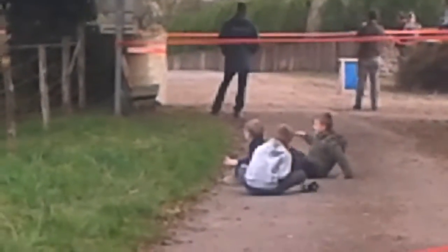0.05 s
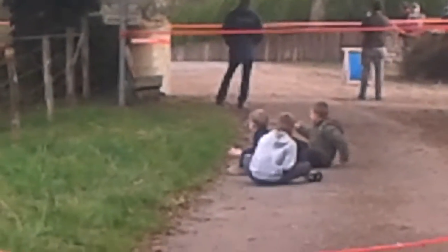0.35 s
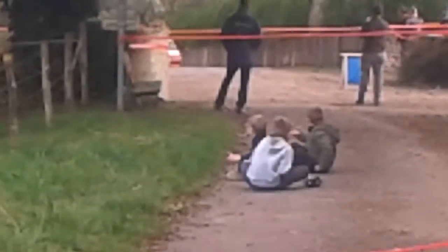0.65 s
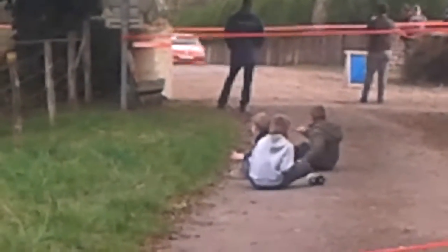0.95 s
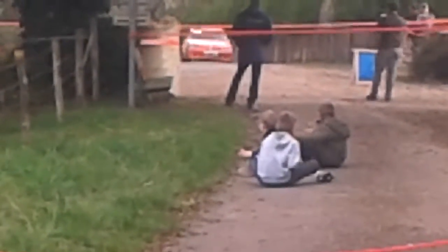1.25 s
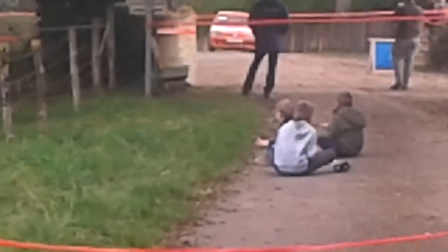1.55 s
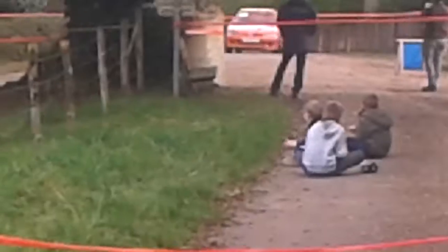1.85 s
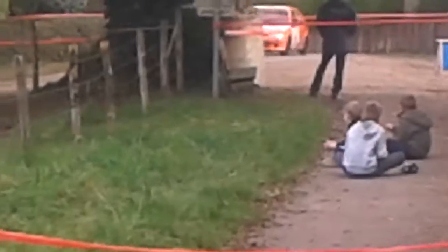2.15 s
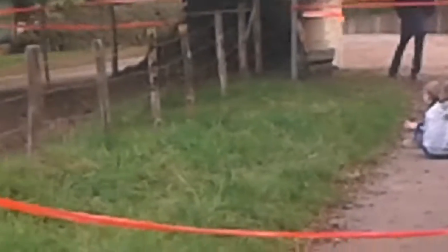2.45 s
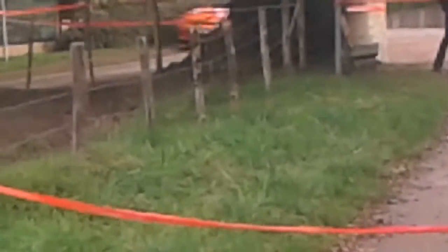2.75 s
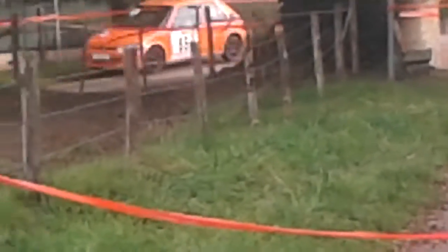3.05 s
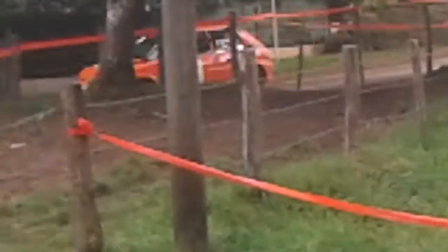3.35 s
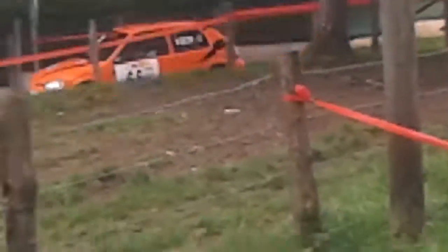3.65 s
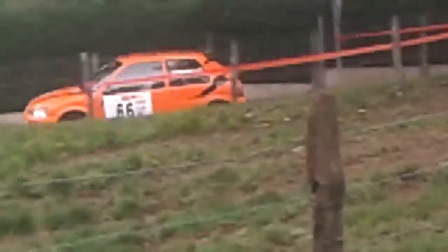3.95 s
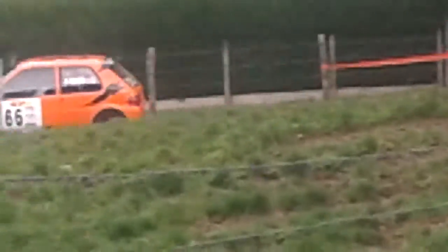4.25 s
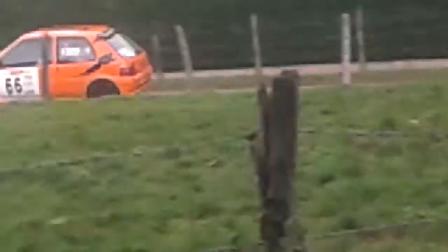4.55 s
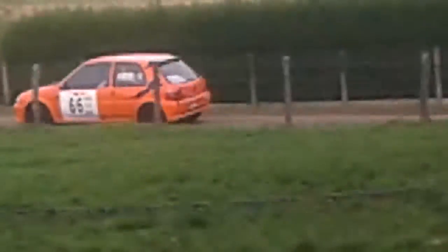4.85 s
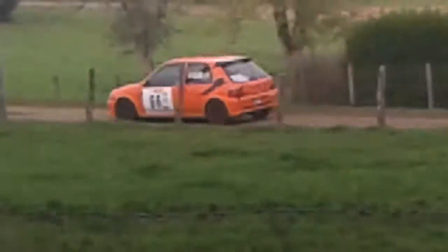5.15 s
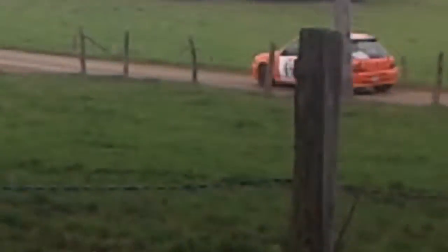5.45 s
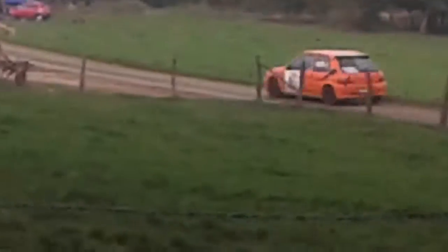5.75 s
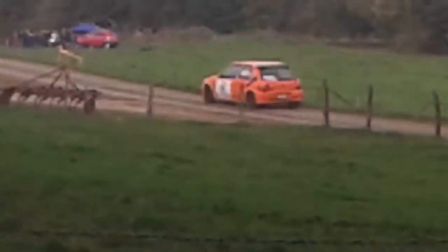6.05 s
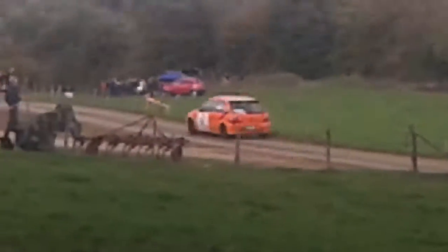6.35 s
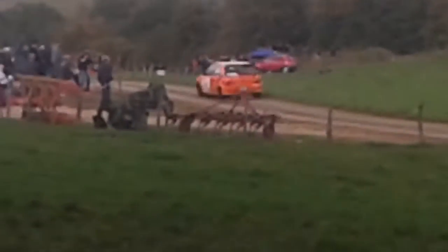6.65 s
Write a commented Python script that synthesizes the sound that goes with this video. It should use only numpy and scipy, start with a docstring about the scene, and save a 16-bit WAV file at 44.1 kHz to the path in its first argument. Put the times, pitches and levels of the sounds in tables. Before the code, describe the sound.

Heard from across a field, a rally car brakes with a short tyre chirp and works through a bend on and off the throttle. Its engine swells into a loud, rising boom with rasp, light clatter and tyre hiss as it goes by. The driver lifts off, the exhaust gives a quick run of pops, and the car drives away in a higher gear, throwing gravel over faint low air noise.

```python
"""Rally car on a dirt road

A four-cylinder hatchback takes a bend on and off the throttle, passes across a field and shifts up.
The exhaust booms on the firing note, with weaker lines from unequal cylinders; fuel pops in the shift.
Gas rasps at each firing, valve gear clatters, tyres hiss, chirp and throw gravel, two stones tick.
Trees return the boom, low air noise flutters, and a faint, distant tone glides in the first second."""
import sys
import numpy as np
from scipy import signal
from scipy.fft import rfft, irfft, next_fast_len
from scipy.io import wavfile
from scipy.ndimage import uniform_filter1d

SR = 44100
rng = np.random.default_rng(int(sys.argv[2]) if len(sys.argv) > 2 else 0)


def master(y):
    """Save y as 16-bit WAV."""
    cut = np.clip(np.atleast_2d(y).T, -1, 1)
    pcm = np.round(cut * 32767)  # scale
    wavfile.write(sys.argv[1], SR, pcm.astype(np.int16))


N = 304731
T = np.arange(N) / SR
PASS_S, SPEED_M_S, CLOSEST_M = 4.92, 15.3, 23
SURGE_DB = 1.1  # spread of rasp and clatter level

# engine speed as heard (time [s], firing rate [Hz])
FIRING_HZ = [(0, 277), (.1, 281), (.35, 241), (.9, 184), (1.0, 212), (1.15, 243), (1.27, 256), (1.5, 225),
             (1.63, 224), (1.77, 204), (1.92, 215), (2.1, 196), (2.46, 212), (2.65, 197), (3.05, 197),
             (3.4, 220), (3.55, 201), (3.72, 210), (3.83, 207), (3.92, 213), (4.1, 217), (4.23, 225),
             (4.45, 227), (4.6, 234), (4.84, 237), (5.06, 247), (5.32, 241), (5.51, 219), (5.6, 200),
             (5.7, 186), (5.82, 196), (5.95, 195), (6.91, 214)]
# (time [s], opening [0-1])
THROTTLE_OPEN = [(5.18, 1), (5.21, .2), (5.495, .2), (5.52, 1)]
# ragged among trees and off throttle, steady under load (time [s], note waver [0-1], overtone waver [0-1])
WAVER = [(0, .32, .8), (1.3, .3, .8), (1.5, .22, .7), (1.9, .17, .4), (2.3, .12, .7), (3.0, .08, 1.),
         (3.8, .05, .8), (4.6, .04, .35), (5.15, .05, .3), (5.25, .2, .4), (5.48, .2, .5), (5.58, .07, .17),
         (6.3, .065, .25), (6.91, .05, .45)]
# exhaust lines at 1, 1.5, 2 and 3 times the firing rate (time [s], level [dB])
BOOM_DB = [(0, -37.5), (.1, -33), (.25, -35.5), (.45, -34), (.68, -27.5), (.87, -38.5), (1.07, -28),
           (1.14, -35.5), (1.5, -27.5), (1.95, -23), (2.2, -26.5), (2.8, -28.5), (2.87, -22.5),
           (3.05, -19.5), (3.4, -14), (4.35, -10.5), (4.7, -12), (4.87, -8.5), (4.97, -10.5), (5.01, -16),
           (5.15, -14), (5.65, -11.5), (5.95, -12.5), (6.45, -11.5), (6.91, -11.5)]
FIFTH_DB = [(.8, -66), (1.1, -46), (1.95, -43.5), (2.55, -43), (2.8, -53), (3.0, -42.5), (3.5, -51),
            (3.8, -61.5)]
OCTAVE_DB = [(0, -68), (.7, -51), (.88, -53), (1.0, -53), (1.35, -54.5), (1.5, -46), (2.14, -39.5),
             (2.25, -55), (3.2, -46.5), (3.95, -33.5), (4.2, -34.5), (4.3, -38), (4.5, -36.5), (4.6, -25.5),
             (4.88, -33.5), (5.02, -23), (5.13, -27), (5.2, -32.5), (5.31, -32), (5.35, -57), (5.49, -55),
             (5.515, -24.5), (5.7, -19), (6.2, -25.5), (6.65, -29), (6.91, -36)]
THIRD_HARMONIC_DB = [(1.45, -66), (1.8, -53), (2.2, -62), (3.35, -64), (3.6, -48), (4.15, -43), (4.5, -51),
                     (5.15, -51), (5.25, -68), (5.5, -66), (5.8, -51), (6.4, -45.5), (6.65, -39),
                     (6.91, -44)]
# brief dips in the boom (time [s], half width [s], depth [dB])
BOOM_DIPS = [(.25, 0.017, 11), (.35, 0.054, 12), (.935, 0.023, 11), (1.19, 0.048, 6), (1.33, 0.064, 11),
             (1.57, 0.011, 4.5), (1.715, 0.018, 17), (2.18, 0.019, 11), (2.32, 0.03, 11), (2.465, 0.014, 4),
             (2.65, 0.039, 5), (2.935, 0.011, 6.5), (3.04, 0.032, 8), (3.28, 0.041, 10), (3.53, 0.037, 5.5),
             (3.65, 0.023, 7), (3.93, 0.012, 4.5), (4.14, 0.071, 5), (4.22, 0.0089, 3.5),
             (4.59, 0.06, 10.5), (5.09, 0.016, 15), (5.416, 0.0064, 13), (5.487, .008, 8)]
# uneven firing (time [s], level of lines between harmonics [dB], scatter level [dB])
UNEVEN_DB = [(0, -56, -47), (1.5, -50, -43.5), (3.0, -46, -42), (3.8, -38, -39), (4.2, -30.5, -36.5),
             (5.15, -23.5, -34.5), (5.3, -36, -40), (5.48, -38, -40), (5.55, -28.5, -35),
             (5.9, -29.5, -35.5), (6.3, -26.5, -38), (6.91, -28.5, -37.5)]
# off-throttle pops (time [s], gain [dB])
POP_DB = [(.168, -34), (.277, -33), (1.005, -33), (1.026, -28), (1.288, -27), (1.675, -34), (2.168, -34),
          (3.375, -29), (5.224, -17.5), (5.246, -11.5), (5.259, -15.5), (5.277, -12), (5.336, -14),
          (5.374, -19), (5.395, -13), (5.432, -12), (5.463, -13), (5.492, -15.5), (5.511, -16)]
# pipe ring after a pop (frequency [Hz], decay [s], gain [dB])
PIPE_MODES = [(72, 0.02, -11), (122, 0.014, -2), (205, 0.016, 6), (262, 0.012, -2), (366, 0.012, -10)]
# gas rasp, loudest under load and close (time [s], level [dB])
RASP_DB = [(0, -53.5), (.7, -46), (.9, -47), (1.25, -42.5), (1.9, -47), (2.4, -48), (2.85, -50.5),
           (3.25, -42), (3.6, -40), (4.2, -39), (4.6, -37.5), (4.8, -39.5), (5.1, -36.5), (5.45, -46),
           (5.75, -40.5), (6.91, -38)]
# tones in the rasp (multiple of firing rate [1], gain [dB])
RASP_TONES = [(4, -21), (5, -21), (6, -26)]
# wall, onlookers, trees and bank hide the car in turn (time [s], half width [s], cover [0-1])
COVER = [(0.355, 0.71, 1.), (1.607, 0.82, .4), (2.801, 0.28, 0.7), (3.719, 0.18, 0.09)]
# loose road swells hiss and clatter (time [s], half width [s], gain [dB])
LOOSE_ROAD = [(.25, 0.5, 4), (2.36, 0.6, 3), (3.28, 0.25, 4), (4.6, 0.1, 4), (5.08, 0.17, 6.5),
              (6.15, 0.24, 1.5), (6.68, 0.027, 3.5)]
# rubber scuffs (time [s], half width [s], level [dB])
TYRE_SCUFFS = [(0.53, 0.015, -45), (0.565, 0.01, -44), (0.595, 0.014, -42.5), (1.586, 0.026, -44.5)]
# tyre tones under braking and in the bend (time [s], pitch [Hz], level [dB])
TYRE_CHIRP = [(.545, 1644, -52), (.558, 1560, -37.5), (.569, 1490, -36.5), (.574, 1400, -26.5),
              (.583, 1400, -33), (.591, 1480, -28), (.599, 1520, -29), (.606, 1440, -45), (.62, 1480, -75)]
TYRE_SQUEAL = [(1.12, 830, -62), (1.22, 890, -56), (1.29, 1020, -54), (1.36, 970, -52), (1.5, 900, -58),
               (1.7, 880, -66), (1.89, 990, -60), (1.94, 1055, -50.5), (2.0, 1100, -49), (2.05, 1060, -51),
               (2.11, 990, -64), (2.18, 925, -53), (2.45, 920, -53), (2.6, 900, -70), (3.0, 890, -70),
               (3.12, 905, -50), (3.24, 930, -44), (3.33, 890, -56)]
# gravel spray and grit crunch (time [s], level [dB])
SPRAY_DB = [(5.9, -66.5), (6.3, -45), (6.55, -43.5), (6.7, -35.5), (6.91, -40.5)]
CRUNCH_DB = [(1.0, -91), (1.3, -68), (1.9, -66), (2.35, -58.5), (2.8, -90)]
# flicked stones (time [s], peak level [dB])
STONE_DB = [(3.4697, -28), (6.4088, -30.5)]
# boom off the trees, lower from those behind, higher from those ahead (time [s], pitch ratio [1], level [dB])
TREE_ECHO = [(3.0, 0.89, -46), (3.65, 0.87, -33), (4.3, 0.85, -36), (4.9, 0.91, -40), (5.5, 1.73, -41),
             (5.9, 1.3, -35.5), (6.4, 0.97, -38), (6.91, 1.3, -39)]
# low air flutter (time [s], level [dB])
FLUTTER_DB = [(0, -45.5), (1.2, -46.5), (2.7, -45), (3.6, -38.5), (4.2, -38.5), (4.7, -40), (5.3, -39),
              (5.8, -45), (6.3, -46.5), (6.91, -46)]
# faint, distant tone (time [s], pitch [Hz], level [dB])
FAR_TONE = [(.2, 458, -53), (.32, 373, -48), (.4, 408.4, -44), (.48, 473, -50), (.6, 498, -49),
            (.7, 411.4, -31.5), (.79, 436.5, -43.5), (.95, 377.6, -47)]

# spectra (frequency [Hz], relative density [dB])
PIPE_SPECTRUM = [(55, -24.5), (100, -10), (120, -4.5), (155, -6.5), (180, 1), (255, 1.5), (305, -2.5),
                 (355, -2), (420, -4), (465, -19.5), (560, -25), (720, -28)]
RASP_SPECTRUM = [(300, -13), (500, -4.5), (625, -1), (750, -4.5), (970, -0.5), (1200, 0), (1450, -5),
                 (1800, -10), (2600, -16.5), (4000, -43.5)]
CLATTER_SPECTRUM = [(900, -29), (1500, 2.5), (1900, 1.5), (2600, 1), (3100, -14), (3800, -20),
                    (5000, -39.5)]
HISS_SPECTRUM = [(2000, -2.5), (3200, 6), (4000, -0.5), (5000, -5.5), (6100, -5.5), (6800, -14.5),
                 (7400, -24), (8000, -52)]
STONE_SPECTRUM = [(1500, 0), (5500, 0), (7000, -7), (9000, -20), (11500, -17)]
FLUTTER_SPECTRUM = [(25, -41), (38, -30), (55, -15), (75, -4), (100, -1.5), (130, -2.5), (200, -7),
                    (400, -12.5), (700, -22)]
SCUFF_SPECTRUM = [(1200, -21.5), (1700, 2), (2200, -3), (2750, -9), (3500, -23), (5000, -60)]
SPRAY_SPECTRUM = [(850, -17), (1150, -2.5), (1400, -.5), (1650, -7.5), (2000, -20.5)]
CRUNCH_SPECTRUM = [(2700, -13.5), (3500, 1), (4200, -6.5), (5000, -20.5)]


def exhaust(firings, shut_db=-13):
    """Firing pulses boom, sinking off throttle; lines sound a fifth, an octave and a twelfth above."""
    note_waver, overtone_waver = curves(WAVER)
    phase = 2 * np.pi * firings
    boom_db = curve(BOOM_DB) - humps(BOOM_DIPS) + shut_db * (1 - curve(THROTTLE_OPEN))
    boom = undb(boom_db) * tone(phase, note_waver, rate_hz=29)
    octave = undb(curve(OCTAVE_DB)) * tone(2 * phase, overtone_waver, rate_hz=34)
    third = undb(curve(THIRD_HARMONIC_DB)) * tone(3 * phase, .3 + .7 * overtone_waver, rate_hz=32)
    fifth = undb(curve(FIFTH_DB)) * tone(1.5 * phase, overtone_waver, rate_hz=20)
    return boom + octave + third + fifth


def uneven_firing(firings):
    """Unequal cylinders add quarter-order lines; random differences between firings ring the pipe."""
    lines_db, scatter_db = curves(UNEVEN_DB)
    note_waver, _ = curves(WAVER)
    phase = 2 * np.pi * firings
    orders = [k / 4 for k in range(1, 12) if k % 4]
    lines = sum(tone(k * phase + rng.uniform(0, 2 * np.pi), .36 + note_waver, rate_hz=17) for k in orders)
    pulses = np.diff(np.floor(firings), prepend=0) * rng.standard_normal(N)
    return colour(lines, PIPE_SPECTRUM) * undb(lines_db) + colour(pulses, PIPE_SPECTRUM) * undb(scatter_db)


def burble(attack_s=.0028):
    """Unburnt fuel pops and rings the pipe; the silencer softens each onset."""
    t, out = T[:SR], np.zeros(N)
    onset = (1 - np.exp(-t / attack_s)) ** 2
    for time_s, pop_db in POP_DB:
        detunes = 1 + .06 * rng.standard_normal(len(PIPE_MODES))
        ring = sum(undb(db) * np.sin(2 * np.pi * hz * detune * t) * np.exp(-t / decay_s)
                   for detune, (hz, decay_s, db) in zip(detunes, PIPE_MODES))
        start = int(time_s * SR)
        out[start:start + len(t)] += undb(pop_db) * ring * onset
    return out


def gas_rasp(firings):
    """Gas rasps at each firing; steady firing brings out overtones, ragged firing smears them."""
    note_waver, _ = curves(WAVER)
    steadiness = np.exp(-note_waver / .1)
    phase = 2 * np.pi * firings
    tones = steadiness * sum(undb(db) * tone(round(k) * phase, waver=1, rate_hz=28) for k, db in RASP_TONES)
    gas = cycle_noise(firings, memory=.25 + .55 * steadiness, cycles=6) * (1 + .2 * np.cos(phase))
    return colour(gas + tones, RASP_SPECTRUM) * undb(curve(RASP_DB) + SURGE_DB * drift(rate_hz=18))


def valve_clatter(firings):
    """Valve gear clatters in step with the firings."""
    level_db = pass_by_db(closest_db=-46, astern_db=3, hidden_db=-2, shut_db=1.5, doubling_db=3.5)
    rattle = cycle_noise(firings, memory=.17, cycles=4) * (1 + .32 * np.cos(2 * np.pi * firings))
    swell_db = humps(LOOSE_ROAD) + SURGE_DB * drift(rate_hz=18)
    return colour(rattle, CLATTER_SPECTRUM) * undb(level_db + swell_db)


def tyre_hiss(firings):
    """Tyres hiss on grit, pulsing slightly at the firing rate."""
    level_db = pass_by_db(closest_db=-51, astern_db=0, hidden_db=-14.5, shut_db=-2, doubling_db=-2.5)
    grit = rng.standard_normal(N) * undb(1.2 * drift(rate_hz=900))
    pulsing = 1 + .15 * np.cos(2 * np.pi * firings)
    swell_db = humps(LOOSE_ROAD) + .5 * drift(rate_hz=9.9)
    return colour(grit * pulsing, HISS_SPECTRUM) * undb(level_db + swell_db)


def tyre_slip():
    """Rubber scuffs, chirps under braking and squeals faintly in the bend."""
    envelope = humps([(time_s, width_s, undb(db)) for time_s, width_s, db in TYRE_SCUFFS])
    scuffs = envelope * colour(rng.standard_normal(N), SCUFF_SPECTRUM)
    chirp = glide(TYRE_CHIRP, waver=.6, rate_hz=380)
    squeal = glide(TYRE_SQUEAL, waver=.48, rate_hz=86)
    return reverb(scuffs + chirp + squeal, t60_s=.6, wet_db=-11.5)


def gravel():
    """Grit crunches in the bend; gravel sprays as the car powers away."""
    grains = rng.standard_normal(N) * undb(1.3 * drift(rate_hz=600))
    crunch = undb(curve(CRUNCH_DB)) * colour(grains, CRUNCH_SPECTRUM)
    spray = (T > SPRAY_DB[0][0]) * undb(curve(SPRAY_DB)) * colour(grains, SPRAY_SPECTRUM)
    return crunch + spray


def stones():
    """Each flicked stone gives one hard, bright click."""
    knocks = np.zeros(N)
    for time_s, db in STONE_DB:
        knocks[int(time_s * SR)] += undb(db)
    clicks = colour(knocks, STONE_SPECTRUM)
    return clicks * knocks.max() / np.abs(clicks).max()


def tree_echo(firing_hz):
    """Trees return the firing note, blurred and with another Doppler shift."""
    ratio, db = curves(TREE_ECHO)
    phase = 2 * np.pi * np.cumsum(firing_hz * ratio) / SR
    return undb(db) * tone(phase, waver=1, rate_hz=22)


def air_flutter():
    """Air flutters: low noise of unsteady level."""
    rumble = colour(rng.standard_normal(N), FLUTTER_SPECTRUM)
    return rumble * undb(curve(FLUTTER_DB) + 2.3 * drift(rate_hz=13))


def far_tone():
    """A faint, distant tone glides around 400-500 Hz in the first second."""
    return glide(FAR_TONE, waver=.27, rate_hz=21.3)


def pass_by_db(closest_db, astern_db, hidden_db, shut_db, doubling_db):
    """Pass-by level: 1/r spreading plus terms for grass, direction, cover and shut throttle."""
    along_m = SPEED_M_S * (T - PASS_S)
    distance_m = np.hypot(along_m, CLOSEST_M)
    spreading_db = 20 * np.log10(CLOSEST_M / distance_m)
    grass_db = doubling_db * np.log2(distance_m / CLOSEST_M)
    direction_db = astern_db * along_m / distance_m
    cover = sum(share * np.exp(-((T - time_s) / width_s) ** 4) for time_s, width_s, share in COVER)
    shut = 1 - curve(THROTTLE_OPEN)
    return closest_db + spreading_db + grass_db + direction_db + hidden_db * cover + shut_db * shut


def reverb(x, t60_s, wet_db):
    """Walls and trees scatter back a thin tail."""
    t = T[:SR // 2]
    tail = rng.standard_normal(len(t)) * np.exp(-np.log(1000) * t / t60_s)
    return x + undb(wet_db) * signal.fftconvolve(x, tail / np.linalg.norm(tail))[:N]


def cycle_noise(firings, memory, cycles):
    """Noise, rms near 1, that partly repeats every engine cycle of four firings."""
    noise, out, power = rng.standard_normal(N), 0, 0
    for k in range(cycles):
        earlier = np.interp(firings - 4 * k, firings, np.arange(N))
        share = np.clip(memory, 0, 1) ** k
        out += share * noise[np.rint(earlier).astype(int)]
        power += share ** 2
    return out / np.sqrt(power)


def glide(table, waver, rate_hz):
    """Wavering tone with soft ends along (time [s], pitch [Hz], level [dB])."""
    hz, db = curves(table)
    gate = uniform_filter1d(1. * (T > table[0][0]) * (T < table[-1][0]), size=900)
    return gate * undb(db) * tone(2 * np.pi * np.cumsum(hz) / SR, waver, rate_hz)


def tone(phase, waver, rate_hz):
    """Tone, rms near 1, wavering in strength and phase."""
    in_phase = (1 + waver * drift(rate_hz)) * np.sin(phase)
    quadrature = waver * drift(rate_hz) * np.cos(phase)
    return np.sqrt(2 / (1 + 2 * waver ** 2)) * (in_phase + quadrature)


def drift(rate_hz):
    """Smooth random curve, rms 1."""
    hold = int(SR / rate_hz)
    steps = np.repeat(rng.standard_normal(N // hold + 1), hold)
    return unit_rms(uniform_filter1d(steps, hold)[:N])


def colour(x, spectrum):
    """Filter by a spectrum, rolling off past its ends; rms 1."""
    hz, db = np.transpose(spectrum)
    size = next_fast_len(N + 4096)
    bin_hz = np.maximum(np.arange(size // 2 + 1) * SR / size, 1)
    skirts = np.minimum(bin_hz / hz[0], 1) ** 2 * np.minimum(hz[-1] / bin_hz, 1) ** 4
    gain = skirts * undb(np.interp(np.log(bin_hz), np.log(hz), db))
    return unit_rms(irfft(rfft(x, size) * gain, size)[:N])


def humps(table):
    return sum(height * np.exp(-((T - time_s) / width_s) ** 2) for time_s, width_s, height in table)


def curves(table):
    """Value columns, linearly interpolated in time."""
    time_s, *columns = np.transpose(table)
    return [np.interp(T, time_s, column) for column in columns]


def curve(table):
    """First value column, interpolated."""
    return curves(table)[0]


def unit_rms(x):
    """Scale to rms 1."""
    return x / np.sqrt(np.mean(x ** 2))


def undb(db):
    """Decibels to gain."""
    return 10 ** (np.asarray(db) / 20)


def scene():
    """Engine, tyres and background, in mono."""
    firing_hz = curve(FIRING_HZ) * (1 + .002 * drift(rate_hz=12))  # wander from bumps and wheel slip
    firings = np.cumsum(firing_hz) / SR
    pipe = exhaust(firings) + uneven_firing(firings) + burble()
    engine = pipe + gas_rasp(firings) + valve_clatter(firings)
    tyres = tyre_hiss(firings) + tyre_slip() + gravel() + stones()
    background = tree_echo(firing_hz) + air_flutter() + far_tone()
    return (engine + tyres + background)[None]


def record(dry):
    """Deep bass and the highest treble are cut away."""
    low_hz, top_hz = 48, 11800
    thin = signal.sosfilt(signal.butter(4, low_hz, "high", fs=SR, output="sos"), dry)
    return signal.sosfilt(signal.ellip(8, .2, 70, top_hz, fs=SR, output="sos"), thin)


dry = scene()
out = record(dry)
master(out)
```